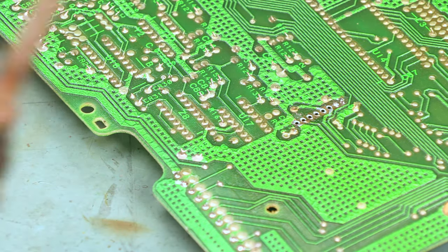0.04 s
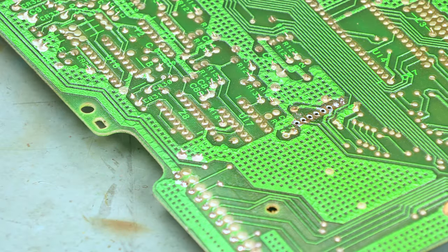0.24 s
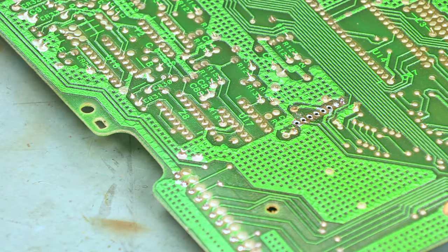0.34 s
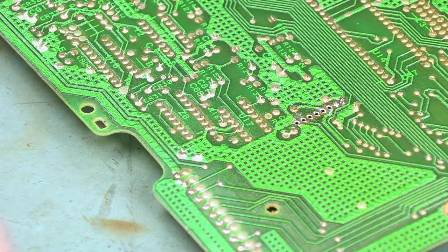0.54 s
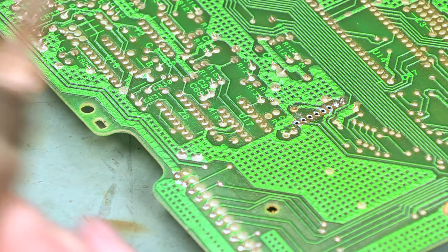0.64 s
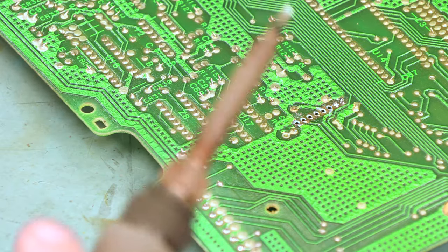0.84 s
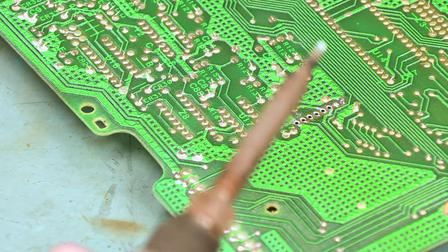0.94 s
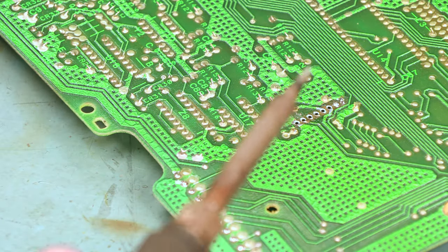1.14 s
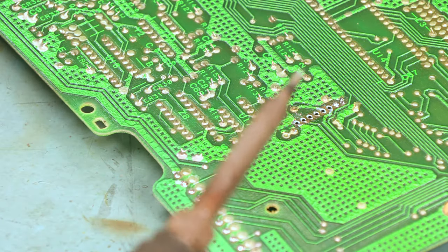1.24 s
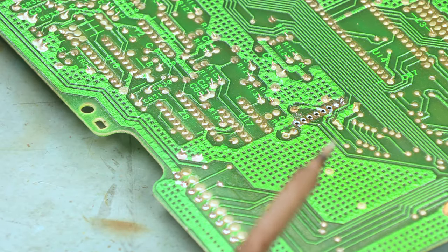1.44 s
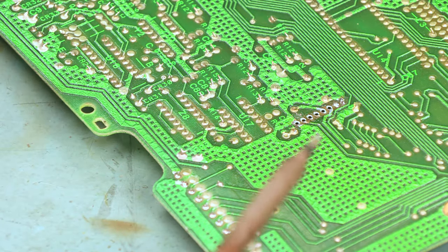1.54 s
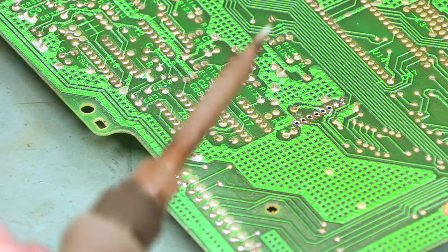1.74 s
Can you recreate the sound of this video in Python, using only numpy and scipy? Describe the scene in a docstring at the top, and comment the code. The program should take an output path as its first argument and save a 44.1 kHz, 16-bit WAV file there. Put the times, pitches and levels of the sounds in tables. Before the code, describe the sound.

Metal tool scraping and clicking by a circuit board, then a few dull knocks.

```python
"""Tool scrapes and bench knocks

A hand tool, likely a soldering iron, scrapes beside a circuit board in four hissing strokes of friction.
The metal squeals where it catches, and sharp clicks at the stroke ends ring its barrel and tip.
Three dull knocks, the first doubled, then ring board and bench with a light rattle; one faint click
follows. Heard close up in a small, quiet room."""
import sys
import numpy as np
from scipy import signal
from scipy.fft import rfft, irfft
from scipy.io import wavfile
from scipy.ndimage import uniform_filter1d

SR = 44100
rng = np.random.default_rng(int(sys.argv[2]) if len(sys.argv) > 2 else 0)


def to_wav(sig):
    """Store sig (one row per channel, or 1-D mono) as 16-bit WAV at the path in sys.argv[1].

    Samples outside -1..1 are clipped; the rate is SR.
    """
    pcm = np.clip(np.atleast_2d(sig), -1, 1) * 32767
    pcm = np.round(pcm).astype(np.int16)
    wavfile.write(sys.argv[1], SR, pcm.T)  # frames by channels


N = 79380
T = np.arange(N) / SR


def amp(db):
    """Decibels to gain."""
    return 10 ** (np.asarray(db) / 20)


def unit_rms(x):
    """Scale to an rms of 1."""
    return x / np.sqrt(np.mean(x ** 2))


def noise():
    """White noise."""
    return rng.standard_normal(N)


def envelope(points):
    """Gain through (time [s], level [dB]) points, silent outside them."""
    time_s, level_db = np.array(points).T
    return amp(np.interp(T, time_s, level_db)) * (T >= time_s[0]) * (T <= time_s[-1])


def pulse(centre_s, sigma_s):
    """Gaussian envelope."""
    return np.exp(-.5 * ((T - centre_s) / sigma_s) ** 2)


def response(spectrum, tilt_db_oct=0, size=4096):
    """Minimum-phase, unit-energy impulse response from (frequency [Hz], level [dB]) points."""
    hz, db = np.array(spectrum).T
    octave = np.log2(np.maximum(np.fft.rfftfreq(size, 1 / SR), 10))
    gain_db = np.interp(octave, np.log2(hz), db) + tilt_db_oct * (octave - octave.mean())
    cepstrum = irfft(np.log(amp(gain_db)))
    cepstrum[1:size // 2] *= 2
    cepstrum[size // 2 + 1:] = 0
    ir = irfft(np.exp(rfft(cepstrum)))
    return ir / np.linalg.norm(ir)


def convolve(x, ir):
    """Pass a sound through an impulse response."""
    return signal.fftconvolve(x, ir)[:N]


def delay(time_s, x):
    """Start a sound at time_s."""
    return np.concatenate([np.zeros(max(int(time_s * SR), 0)), x])[:N]


def ring(modes, t60_scale=1):
    """Decaying modes of a struck object; mixed polarities spread the attack."""
    out = 0
    for k, (hz, db, t60_s) in enumerate(modes):
        polarity = (-1) ** (k // 3)
        decay = np.exp(-np.log(1000) * T / (t60_s * t60_scale))
        out += polarity * amp(db) * np.sin(2 * np.pi * hz * T) * decay
    return out


# room tone (frequency [Hz], level [dB])
BACKGROUND_SPECTRUM = [(12, -31), (20, 3), (70, -8.5), (119, 0), (149, -10), (203, -7.5), (345, -13.5),
                       (693, -13.5), (819, -16), (2430, -29.5), (3500, -33), (4020, -34), (15800, -37.5)]
BACKGROUND_DB = -56.5


def background():
    """Faint, steady low noise."""
    return amp(BACKGROUND_DB) * unit_rms(convolve(noise(), response(BACKGROUND_SPECTRUM)))


# pressure, one list per stroke (time [s], level [dB])
STROKE_PRESSURES = [
    [(.033, -52), (.036, -48), (.046, -44.5), (.082, -46), (.1, -55), (.115, -46.5), (.13, -71)],
    [(.125, -59), (.17, -51.5), (.223, -40.5), (.23, -31.5), (.282, -32), (.293, -42.5), (.302, -37.5),
     (.312, -44), (.33, -73)],
    [(.44, -58.5), (.452, -45), (.468, -46), (.485, -58.5)],
    [(.492, -57.5), (.52, -40), (.54, -34.5), (.57, -33.5), (.6, -36.5), (.62, -37), (.63, -56)],
]
# tone per stroke (hiss tilt [dB/octave], relative squeal [dB])
STROKE_TONES = [(-3.7, -15), (3.5, -12.5), (-1, -9.5), (-1.15, -11.5)]
# bright and dull friction (frequency [Hz], level [dB])
HISS_SPECTRUM = [(100, -28), (400, -17), (1400, -21.5), (3200, -20.5), (5000, -8.5), (6300, 1.5),
                 (7000, -2), (7700, -5), (9000, -2), (10200, -2), (11800, -9.5), (13200, -10.5),
                 (14200, -18), (15800, -21.5)]
DRAG_SPECTRUM = [(100, -11.5), (500, -7.5), (1400, 0.5), (2700, -0.5), (3200, 2), (4500, 1), (6000, -5),
                 (9000, -21), (15000, -35.5)]
# squeal flares (time [s], level [dB], sigma [s])
CATCHES = [(0.228, -38.5, .004), (0.28, -36.5, .003), (0.288, -35.5, .003), (0.3, -35, .002)]
GRIT_DEPTH_DB, GRIT_RATE_HZ = 1.5, 660
SQUEAL_HZ, SQUEAL_WIDTH_HZ = 6410, 300.5
DRAG_DB, DRAG_EXPONENT = -24, .6


def scraping():
    """Gritty friction: hiss grows faster with pressure than drag; the metal squeals where it catches."""
    roughness = unit_rms(uniform_filter1d(noise(), int(SR / GRIT_RATE_HZ)))
    grit = amp(GRIT_DEPTH_DB * roughness)
    slips = noise() * grit
    resonance = np.exp(-np.pi * SQUEAL_WIDTH_HZ * T) * np.sin(2 * np.pi * SQUEAL_HZ * T)
    squeal = unit_rms(convolve(noise() * grit, resonance))
    drag = amp(DRAG_DB) * unit_rms(convolve(noise() * grit, response(DRAG_SPECTRUM)))
    out = squeal * sum(amp(db) * pulse(time_s, sigma_s) for time_s, db, sigma_s in CATCHES)
    for stroke, (tilt_db_oct, squeal_db) in zip(STROKE_PRESSURES, STROKE_TONES):
        pressure = envelope(stroke)
        hiss = unit_rms(convolve(slips, response(HISS_SPECTRUM, tilt_db_oct)))
        out += pressure * (hiss + amp(squeal_db) * squeal) + pressure ** DRAG_EXPONENT * drag
    return out


# tool contacts (time [s], body [dB], middle [dB], treble [dB], barrel [dB], tip [dB],
# chatter decay [s], contact resonance [Hz], resonance level [dB])
CLICKS = [(0.0812, -38.5, -26.5, -22, -50, -42, .003, 3850, -39),
          (0.0936, -59, -48, -63, -55, -48, .002, 3600, -59),
          (0.3051, -29, -16.5, -20.5, -45, -48, .0015, 1745, -26),
          (.3065, -33, -12.5, -4, -38, -42, 0.0021, 13100, -26),
          (0.402, -51.5, -42, -49, -51, -59, .001, 785, -56),
          (.4562, -31, -23, -19.5, -43.5, -41.5, 0.0024, 3940, -35),
          (0.4593, -36, -16.5, -19.5, -36.5, -50, 0.0021, 2074, -29.5),
          (0.6216, -25.5, -2, 1.5, -2, -36, 0.0015, 1058, -22),
          (0.6265, -31, -13.5, -15.5, -21.5, -29.5, .004, 3630, -26.5),
          (1.624, -46.5, -65, -64, -68, -64.5, .002, 680, -46.5)]
# click bands (frequency [Hz], level [dB])
BODY_SPECTRUM = [(30, -21.5), (120, -16.5), (220, -1), (380, 2), (600, -8), (1200, -14.5), (4000, -50.5),
                 (15000, -69)]
MIDDLE_SPECTRUM = [(250, -40.5), (750, -5), (1100, 0), (1400, -3), (2200, 2.5), (3000, -2), (3700, 5),
                   (5000, -2.5), (9000, -25.5), (15000, -40)]
TREBLE_SPECTRUM = [(1500, -31), (4500, -15.5), (6000, 2), (7200, 0), (8200, -8.5), (9800, -3), (11500, -12),
                   (13500, -16), (15500, -23)]
# tool modes (frequency [Hz], relative level [dB], t60 [s])
BARREL_MODES = [(1023, -16, .125), (1599, -26, .15), (2250, -16, .15), (2650, -14, .065), (3000, -18, .12),
                (3410, -16, .06), (4247, -12, .06), (4420, -20, .08), (5034, -22, .12), (5881, -5, .048),
                (6530, -16, .06), (9120, -17, .08)]
TIP_MODES = [(3560, -5, .03), (3628, -2, .055), (3686, -7, .065)]
CHATTER_DB, TAIL_DB, TAIL_DECAY_S = -15, -17.5, .0087
WASH_DB, WASH_DECAY_S = -38, .036
BARREL_TRIM_DB, RESONANCE_DECAY_S, RING_ROOM_SEND = -15.5, .0032, .9


def clicks():
    """Hard contacts: an impulse, brief chatter, ringing barrel and tip, and a diffuse room wash."""
    bands = map(response, (BODY_SPECTRUM, MIDDLE_SPECTRUM, TREBLE_SPECTRUM))
    bands = [ir / np.abs(ir).max() for ir in bands]
    barrel = amp(BARREL_TRIM_DB) * ring(BARREL_MODES)
    tip = ring(TIP_MODES)
    walls = response(ROOM_SPECTRUM)
    cracks, rings = 0, 0
    for time_s, *bands_db, barrel_db, tip_db, chatter_s, resonance_hz, resonance_db in CLICKS:
        fade = amp(CHATTER_DB) * np.exp(-T / chatter_s) + amp(TAIL_DB) * np.exp(-T / TAIL_DECAY_S)
        chatter = .32 * noise() * fade
        wash = amp(WASH_DB) * convolve(noise(), walls) * np.exp(-T / WASH_DECAY_S)
        contact = chatter + wash
        contact[0] = .48  # impact impulse
        colour = sum(amp(db) * band for db, band in zip(bands_db, bands))
        resonance = np.sin(2 * np.pi * resonance_hz * T) * np.exp(-T / RESONANCE_DECAY_S)
        cracks += delay(time_s, convolve(contact, colour) + amp(resonance_db) * resonance)
        rings += delay(time_s, amp(barrel_db) * barrel + amp(tip_db) * tip)
    return cracks + rings + RING_ROOM_SEND * room(rings)


# handle bumps (time [s], level [dB], pitch [Hz], sigma [s])
BUMPS = [(.0826, -25, 564, 0.00072), (0.281, -42.5, 300, .003), (.306, -40, 201.8, .003),
         (0.309, -41, 65, .009), (.332, -47.5, 385, .006), (.4185, -38.5, 605, .001),
         (.46, -46.5, 50, .009), (.462, -35.5, 414.3, 0.0065), (.815, -46.5, 130, .005)]


def bumps():
    """Soft bumps of the handle, each a short low tone pulse."""
    return sum(amp(db) * pulse(time_s, sigma_s) * np.sin(2 * np.pi * hz * (time_s - T))
               for time_s, db, hz, sigma_s in BUMPS)


# high tool modes (frequency [Hz], level [dB], t60 [s])
ZING_MODES = [(10450, -50, .3), (12450, -46, .08), (13450, -45, .14), (13750, -52, .2)]
ZING_START_S = .3065


def zing():
    """Thin high ring left by the bright click at 0.3065 s."""
    return delay(ZING_START_S, ring(ZING_MODES))


# handle motion (time [s], level [dB])
SLIDE_LEVELS = [(.36, -70), (.4, -49.5), (.42, -59.5), (.45, -52), (.48, -70)]
RUB_LEVELS = [(.805, -68), (.815, -56), (.85, -60.5), (.93, -73), (.965, -60), (1.015, -51), (1.06, -65),
              (1.1, -78)]
# handle friction (frequency [Hz], level [dB])
SLIDE_SPECTRUM = [(200, -28.5), (550, -13), (830, -2.5), (1200, -11.5), (2500, -33)]
RUB_SPECTRUM = [(200, 10), (900, 2), (2000, -0.5), (3000, -2.5), (6200, -2.5), (10500, -11), (15000, -35)]


def handle_friction():
    """The handle slides dully, then rubs faintly around the knocks."""
    slide = envelope(SLIDE_LEVELS) * convolve(noise(), response(SLIDE_SPECTRUM))
    rub = envelope(RUB_LEVELS) * convolve(noise(), response(RUB_SPECTRUM))
    return slide + rub


# bench knocks (time [s], ring [dB], t60 scale [ratio], thud [dB], rattle [dB], tick [dB])
KNOCKS = [(0.8538, -28, 0.49, -27, -37.5, -35), (.865, -31, 0.41, -35, -38.5, -41.5),
          (0.915, -36.5, 0.28, -36.5, -46.5, -43.5), (0.9723, -26.5, 1.064, -28, -46, -41.5)]
# board and bench modes (frequency [Hz], relative level [dB], base t60 [s])
BENCH_MODES = [(60, -7, .26), (102, 1, .38), (117, -10, .36), (154, -6, .3), (203, -13, .38),
               (233, -10, .24), (273, -7, .33), (334, -10, .3), (378, -11, .28), (436, -13, .18),
               (468, -5, .14), (511, -15, .25), (598, -14, .18)]
# bench thud, loose parts, board tick (frequency [Hz], level [dB])
THUD_SPECTRUM = [(25, -7.5), (80, 13), (180, 1), (480, 1), (620, -9.5), (800, -43), (2000, -41.5)]
RATTLE_SPECTRUM = [(300, -13), (800, 3.5), (1500, -7.5), (2000, -6), (2600, 3), (3300, 1.5), (4300, -9),
                   (6200, -4.5), (8500, -11), (10500, -10), (13000, -30), (15800, -36)]
TICK_SPECTRUM = [(1200, -5.5), (2100, -18), (2450, -3), (2750, -5.5), (3100, -1), (3500, -14), (4200, -6.5),
                 (9000, -21.5), (15000, -44)]
BODY_RISE_S, THUD_DECAY_S, RATTLE_DECAY_S, TICK_DECAY_S = .0024, .038, .026, .0063


def knocks():
    """Each knock ticks, thuds, rings board and bench, and shakes loose parts."""
    thud_ir, rattle_ir, tick_ir = map(response, (THUD_SPECTRUM, RATTLE_SPECTRUM, TICK_SPECTRUM))
    attack = 1 - np.exp(-T / BODY_RISE_S)
    out = 0
    for time_s, ring_db, t60_scale, thud_db, rattle_db, tick_db in KNOCKS:
        ringing = amp(ring_db) * ring(BENCH_MODES, t60_scale)
        thud = amp(thud_db) * convolve(noise(), thud_ir) * np.exp(-T / THUD_DECAY_S)
        rattle = amp(rattle_db) * convolve(noise() * np.exp(-T / RATTLE_DECAY_S), rattle_ir)
        tick = amp(tick_db) * convolve(noise() * np.exp(-T / TICK_DECAY_S), tick_ir)
        out += delay(time_s, (ringing + thud) * attack + rattle + tick)
    return out


# wall reflections (frequency [Hz], level [dB])
ROOM_SPECTRUM = [(60, -13.5), (400, -4), (1000, 1.5), (2400, -1.5), (6000, -7.5), (10000, -9.5),
                 (15800, -4)]
ROOM_DB, ROOM_T60_S, ROOM_DELAY_S = -12, .35, .0044


def room(x):
    """Short diffuse reflections of a small room."""
    reflections = noise() * np.exp(-np.log(1000) * T / ROOM_T60_S)
    tail = delay(ROOM_DELAY_S, convolve(reflections, response(ROOM_SPECTRUM)))
    return amp(ROOM_DB) * convolve(x, tail / np.linalg.norm(tail))


KNOCK_ROOM_SEND = .53


def scene():
    """Tool and bench in the room over a faint background, mono."""
    tool = scraping() + bumps() + handle_friction()
    bench = knocks()
    mix = tool + bench + background() + room(tool + KNOCK_ROOM_SEND * bench) + clicks() + zing()
    return mix[None]


CUTOFF_HZ = 15750


def record(dry):
    """Steep low-pass on the top treble."""
    return signal.sosfilt(signal.ellip(10, .1, 70, CUTOFF_HZ, fs=SR, output="sos"), dry)


dry = scene()
out = record(dry)
to_wav(out)
```